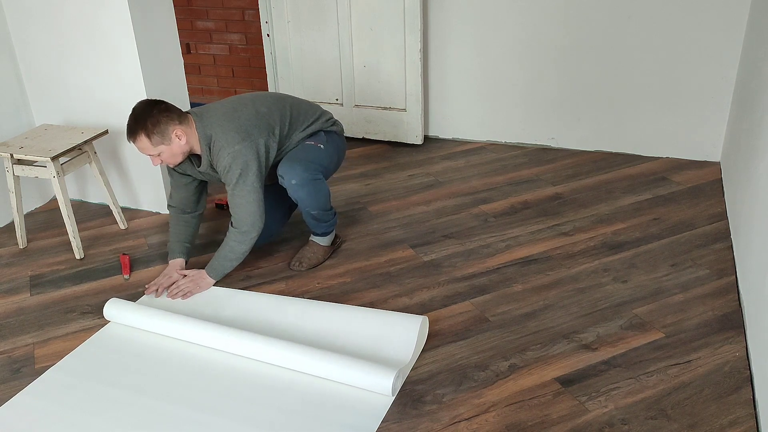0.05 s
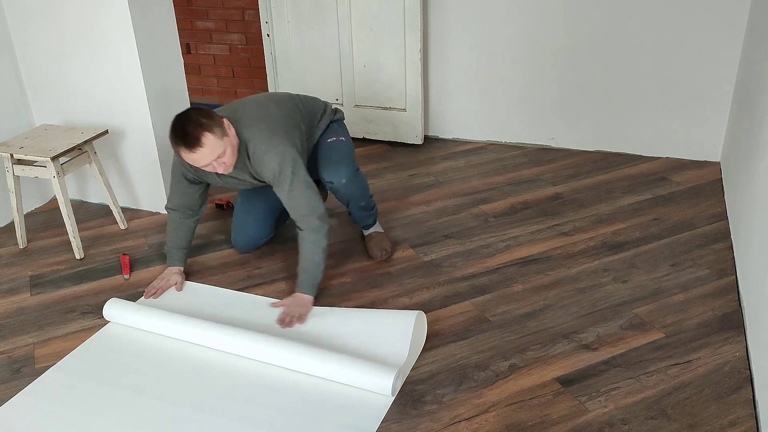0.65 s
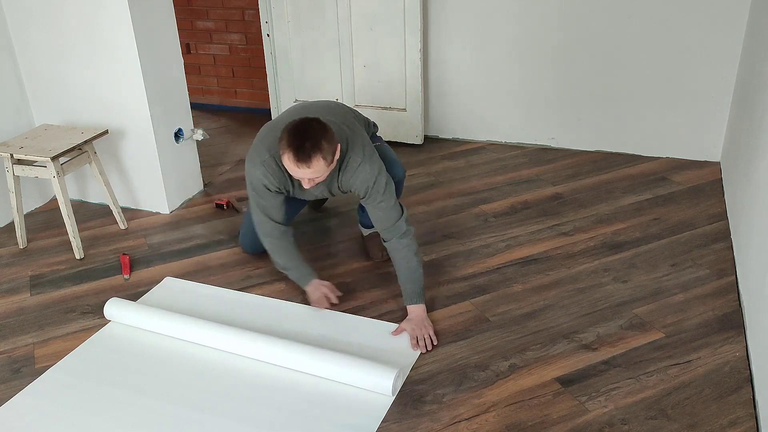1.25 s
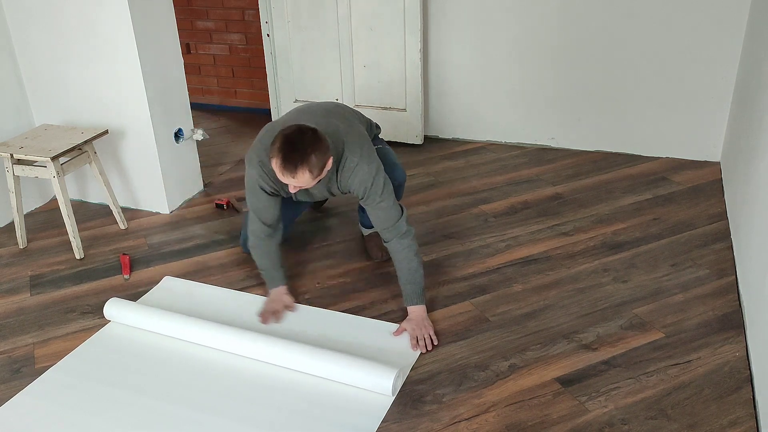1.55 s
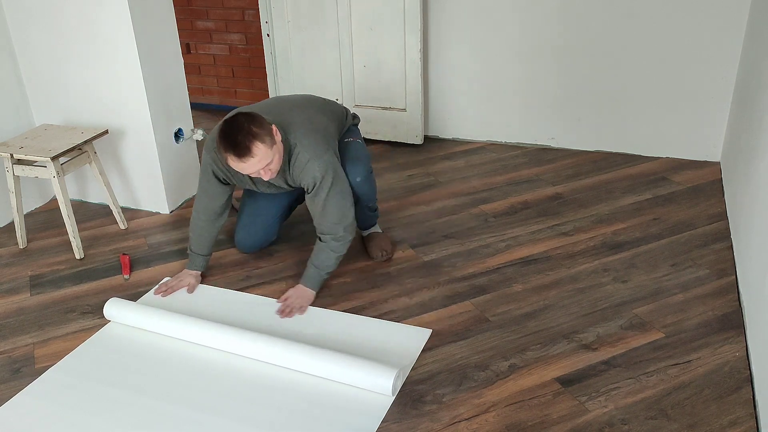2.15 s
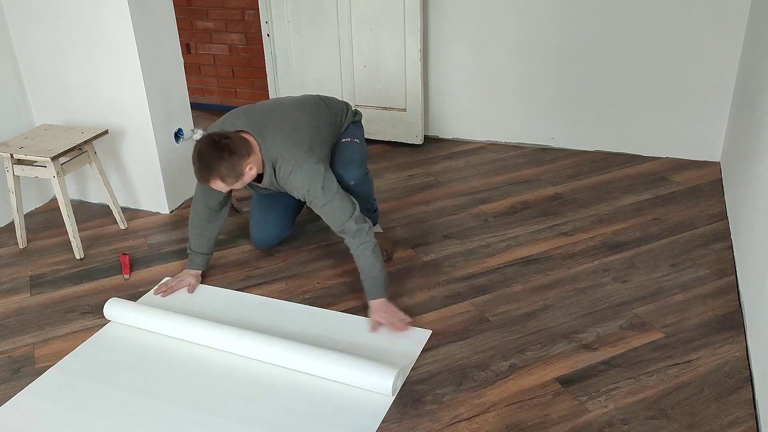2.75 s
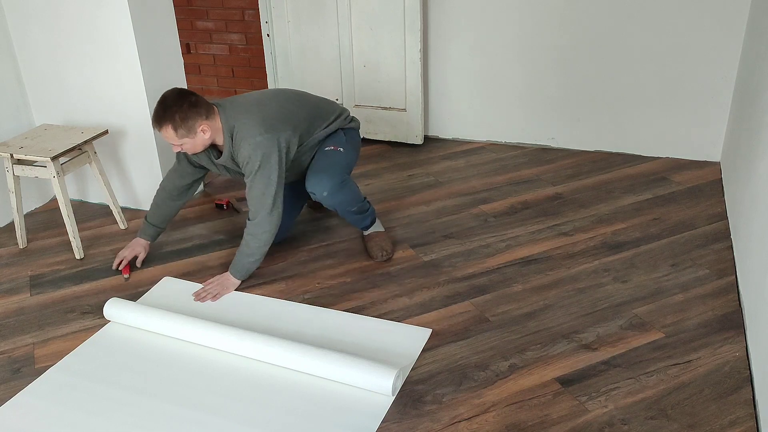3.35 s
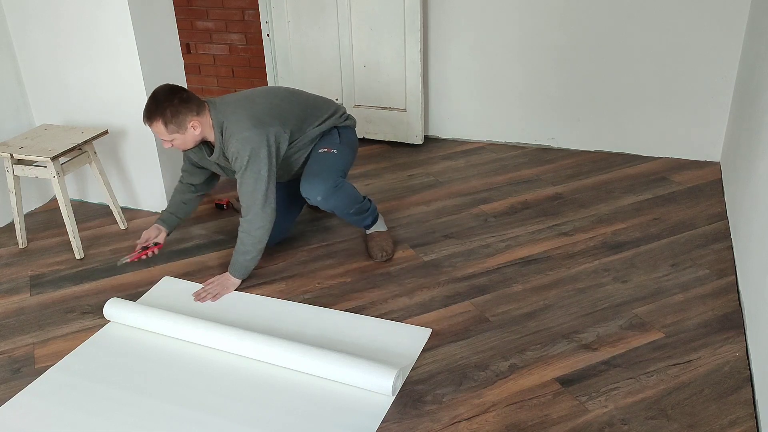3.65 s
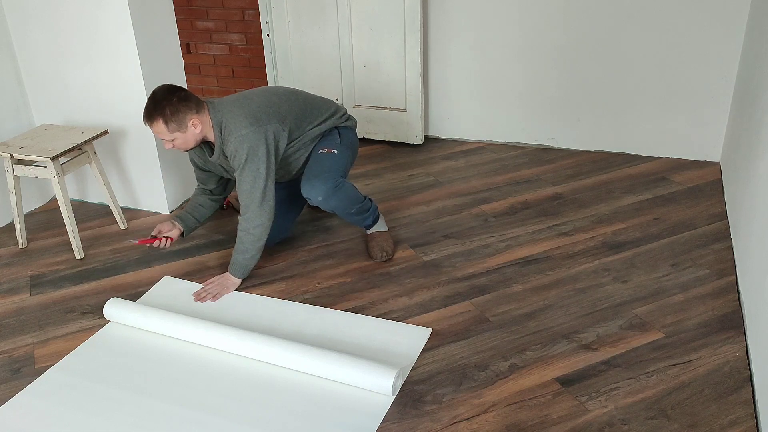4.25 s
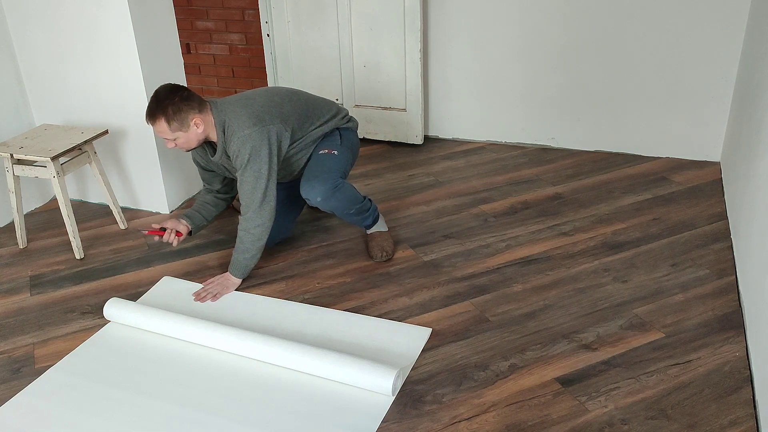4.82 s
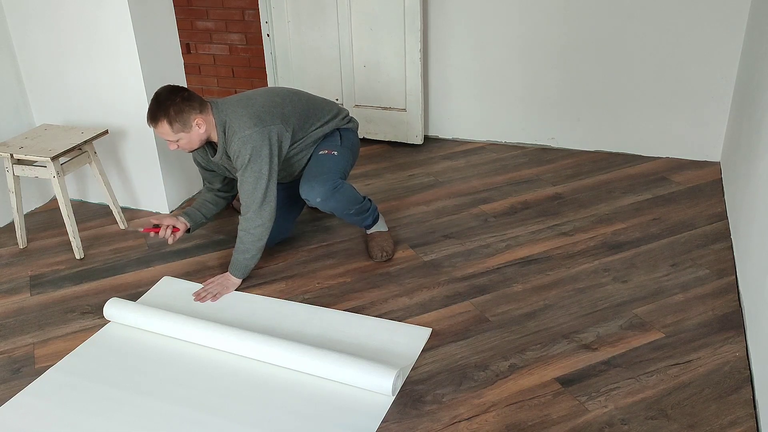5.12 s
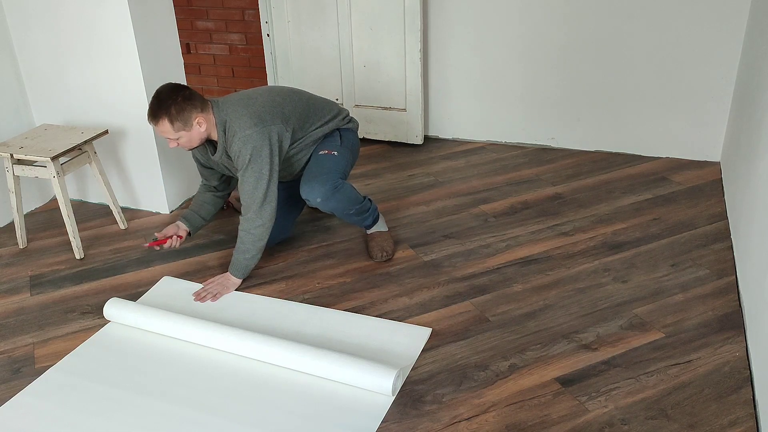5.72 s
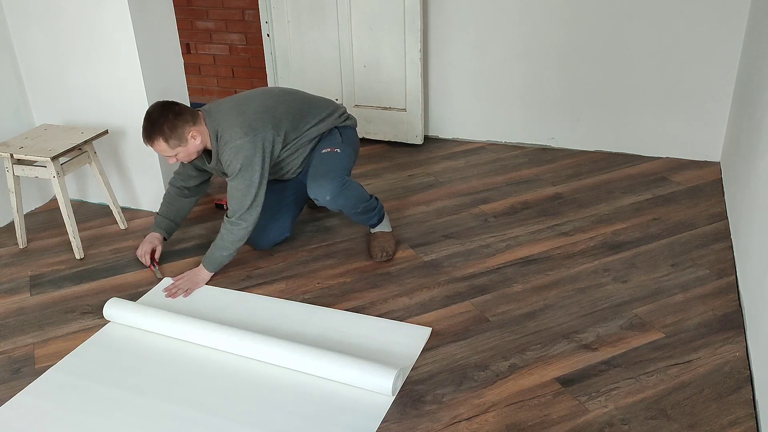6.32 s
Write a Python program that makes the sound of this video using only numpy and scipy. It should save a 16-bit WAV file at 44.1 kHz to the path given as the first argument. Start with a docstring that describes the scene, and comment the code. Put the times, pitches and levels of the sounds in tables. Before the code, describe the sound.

After faint sleeve rubs, a palm sweeps across wallpaper on a laminate floor from about 0.4 to 1.1 seconds. The curled end rustles and buckles in a few quick crinkles, and a knee thumps softly on the boards. A second, louder hissing sweep with a raspy edge swells from 1.5 to 1.9 seconds, a third runs from 2.1 to 2.7, and a small brush follows at 3.1. Around 3.5 seconds a plastic craft knife is picked up with a short scrape, and it gives a sharp click near 4. Its blade is pushed out in brief, bright scrapes and clicks, lightly around 4.8 and more strongly between 5.1 and 5.6. A softer swish of paper comes at 6 seconds, then a faint tick at 6.5. Everything is heard from a few metres away, with the echo of bare walls, over faint room hiss and low rumble.

```python
"""Wallpaper and craft knife in a bare room

Two microphones stand a few metres off and hear mostly the echo of the walls. On the laminate floor a palm
smooths wallpaper in long, hissing sweeps; the curled end rustles and buckles as it is pressed down.
Then a plastic craft knife is picked up and its blade pushed out in short scrapes and clicks that ring
handle and steel. Underneath are soft sleeves and knees, and the room's faint hiss and rumble."""
import sys
import numpy as np
from scipy import signal
from scipy.fft import rfft, irfft, next_fast_len
from scipy.io import wavfile
from scipy.ndimage import map_coordinates

SR = 44100
rng = np.random.default_rng(int(sys.argv[2]) if len(sys.argv) > 2 else 0)


def master_out(mix):
    """Clip the mix to full scale and print it as 16-bit PCM to the path in sys.argv[1]."""
    frames = np.transpose(np.atleast_2d(mix))
    ceiling = np.clip(frames, -1, 1)
    pcm = np.round(ceiling * 32767).astype(np.int16)
    wavfile.write(sys.argv[1], SR, pcm)


N = 290178


def amp(db):
    """Decibels to gain."""
    return 10 ** (np.asarray(db) / 20)


def unit(x):
    """Scale to rms 1."""
    return x / np.sqrt(np.mean(x ** 2) + 1e-20)


def along(points, hz):
    """(Hz, value) points read on a log axis."""
    freqs, values = np.transpose(points)
    return np.interp(np.log(hz + 1), np.log(freqs + 1), values)


def add(track, start, sound):
    """Mix a sound in at start seconds."""
    part = track[max(round(start * SR), 0):][:len(sound)]
    part += sound[:len(part)]


def swell(rows):
    """Gain per sample: each row rises along a bowed curve, holds and falls almost straight."""
    t, gain = np.arange(N) / SR, np.zeros(N)
    for start, rise, hold, fall, db in rows:
        up = np.clip((t - start) / rise, 0, 1) ** 0.66
        down = np.clip(1 - (t - start - rise - hold) / fall, 0, 1) ** 0.97
        gain += amp(db) * up * down
    return gain


def filtered(x, response):
    """Pass x through a complex response of frequency."""
    n = x.shape[-1]
    size = next_fast_len(n + SR // 4)
    return irfft(rfft(x, size) * response(np.fft.rfftfreq(size, 1 / SR)), size)[..., :n]


def coloured(x, spectrum):
    """Shape x by (Hz, dB) points."""
    return filtered(x, lambda hz: amp(along(spectrum, hz)))


def ring(modes, hz):
    """Response of (centre Hz, width Hz, dB) resonances of alternating sign."""
    return sum((-1) ** k * amp(db) * 1j * hz * width / (centre ** 2 - hz ** 2 + 1j * hz * width)
               for k, (centre, width, db) in enumerate(modes))


def slips(n, rate, spread_db):
    """Tiny stick-slip impulses of uneven size at random times, about rate a second, rms 1."""
    chance, sizes, signs = rng.random(n), rng.standard_normal(n), rng.choice([-1, 1], n)
    return unit((chance < rate / SR) * signs * amp(spread_db * sizes))


# Diffuse sound at the microphone pair. Each row: frequency in Hz, left-right likeness from 0 to 1.
MIC_LIKENESS = [(100, 0.59), (300, 0.77), (600, 0.42), (1100, 0), (14000, 0)]

def diffuse(pair):
    """Two unrelated signals as closely spaced microphones hear them: alike in the bass only."""
    turn = lambda hz: np.arccos(np.clip(along(MIC_LIKENESS, hz), -1, 1)) / 2
    mid, side = filtered(pair, lambda hz: np.array([np.cos(turn(hz)), np.sin(turn(hz))]))
    return np.array([mid + side, mid - side])


# The air and the rumble all round the microphones. Each row: frequency in Hz, relative level in dB.
AIR_SPECTRUM = [(20, 2.5), (45, -10.5), (58, 2.5), (78, -10), (120, -9), (230, -11), (330, -17), (650, -24),
                (1100, -20.5), (3000, -19.5), (5000, -27), (7500, -26.5), (10000, -35), (14000, -33.5)]
RUMBLE_SPECTRUM = [(4, 4), (12, 3.5), (25, -4), (50, -10), (110, -31), (400, -82)]
# Extra rumble. Each row: start, rise, hold and fall in seconds, level in dB.
RUMBLE_SURGE = [(4.45, 0.5, .1, 1.7, -60)]

def room_tone(air_db, rumble_db):
    """The still room: faint hiss over a low rumble, steady but for one slow swell."""
    air = diffuse(coloured(rng.standard_normal((2, N)), AIR_SPECTRUM))
    rumble = diffuse(coloured(rng.standard_normal((2, N)), RUMBLE_SPECTRUM))
    return amp(air_db) * unit(air) + (amp(rumble_db) + swell(RUMBLE_SURGE)) * unit(rumble)


# The bare room's echo. Each row: frequency in Hz, seconds to die away by 60 dB.
DECAY_TIMES = [(150, 1), (800, 1), (2200, 0.99), (4000, 0.77), (7000, 0.62), (13000, 0.36)]

def room_decay(hz, t):
    """Gain left in each band after t seconds; the treble dies first."""
    return amp(-60 * t / along(DECAY_TIMES, hz)[:, None])


def wall_echo(direct_db, early_db, early_s):
    """Impulse response from one spot to the microphones: direct sound, early reflections, tail."""
    hz, t, noise = signal.stft(rng.standard_normal((2, SR)), SR, nperseg=256)
    decay = room_decay(hz, t) * (1 + amp(early_db) * np.exp(-t / early_s))
    decay /= np.sqrt(np.mean(decay ** 2, axis=1, keepdims=True))
    response = diffuse(signal.istft(noise * decay, SR, nperseg=256)[1])
    response /= np.linalg.norm(response, axis=1, keepdims=True)
    response[:, 0] += amp(direct_db)
    return response


def scattered(x):
    """Fully diffuse reverberation: fresh noise in each band holds the source's dying energy."""
    hz, t, bands = signal.stft(np.pad(x, (256, 0)), SR, nperseg=512)
    fade = room_decay(hz, t[t < 1]) ** 2
    fade /= fade.sum(axis=1, keepdims=True)
    energy = signal.fftconvolve(np.abs(bands) ** 2, fade, axes=1)[:, :len(t)]
    noise = signal.stft(rng.standard_normal((2, N + 256)), SR, nperseg=512)[2]
    tail = signal.istft(noise * np.sqrt(np.abs(energy)), SR, nperseg=512)[1][:, :N]
    return unit(diffuse(tail)) * np.std(x)


def room(x, still_share, direct_db, early_db, early_s):
    """A source a few metres off: part of its echo comes from still walls, the rest keeps changing."""
    walls = signal.fftconvolve(x[None], wall_echo(direct_db, early_db, early_s), axes=1)[:, :N]
    return np.sqrt(still_share) * walls + np.sqrt(1 - still_share) * scattered(x)


def scuff(length, spectrum):
    """A brief, coarse rub that starts quickly and lets go after length seconds."""
    t = np.arange(SR // 3) / SR
    push = (1 - np.exp(-t / 0.00067)) * np.exp(-np.maximum(t - length, 0) / 0.011)
    grain = coloured(slips(len(t), rate=1800, spread_db=4.0), spectrum)
    return push * unit(grain)


# Sleeves, and the knife's handle on the floor. Each row: start and length in seconds, level in dB.
FLOOR_RUBS = [(.01, 0.23, -65.5), (.198, 0.25, -66), (1.461, 0.084, -57), (1.757, 0.21, -56.5),
              (2.097, 0.097, -61.5), (3.101, 0.15, -58.5), (3.46, 0.071, -54.5), (5.149, .12, -67.5),
              (5.59, 0.068, -57.5), (6.16, 0.068, -56.5), (6.481, 0.04, -65)]
# Their dull colour. Each row: frequency in Hz, relative level in dB.
RUB_SPECTRUM = [(100, -17), (260, -7), (450, 1.5), (780, -0.5), (1100, -0.5), (1600, -4.5), (4000, -15)]
# Knees and hands settling on the boards. Each row: start in seconds, level in dB, pitch in Hz.
FLOOR_THUMPS = [(0.199, -56.5, 184), (0.831, -49, 125), (0.859, -48, 59), (1.82, -52, 260),
                (1.89, -58.5, 113), (2.145, -54.5, 137), (2.429, -62, 140), (2.898, -59, 180),
                (4.27, -60, 105)]

def kneeling():
    """Someone shifts about on the floor: soft rubs, and low thumps from the boards."""
    track = np.zeros(N)
    t = np.arange(SR // 3) / SR
    for start, length, db in FLOOR_RUBS:
        add(track, start, amp(db) * scuff(length, RUB_SPECTRUM))
    thump = (1 - np.exp(-t / 0.0027)) * np.exp(-t / 0.031)
    for start, db, pitch in FLOOR_THUMPS:
        boards = filtered(rng.standard_normal(len(t)), lambda hz: ring([(pitch, 0.75 * pitch, 0)], hz) ** 2)
        add(track, start, amp(db) * thump * unit(boards))
    return track


# The knife's cavity, plastic shell and steel blade. Each row: centre and width in Hz, relative gain in dB.
CAVITY_MODES = [(1090, 89, -2), (1630, 114, -12)]
SHELL_MODES = [(2183, 420, -4), (2600, 390, -0.5), (3050, 340, -1.5), (4050, 610, -6)]
BLADE_MODES = [(6570, 1580, -6.5), (7700, 1620, -5.5), (12600, 4300, -17)]
# The unresonant part of a contact. Each row: frequency in Hz, relative level in dB.
CRACKLE_SPECTRUM = [(900, -9.5), (1600, 0.5), (3500, 2.5), (8000, 2.5), (10000, -15), (14000, -24)]

def knife_body(force, blade_db, contact_hz):
    """A contact rings cavity, shell, blade and the touched spot; the force's energy is kept."""
    force = np.pad(force, (0, SR // 20))
    cavity_db = -3 - 0.52 * blade_db  # the more the blade is stirred, the less the cavity
    body = filtered(force, lambda hz: amp(cavity_db) * ring(CAVITY_MODES, hz) + ring(SHELL_MODES, hz)
                    + amp(blade_db) * ring(BLADE_MODES, hz))
    # spot and crackle share the force's outline but not its fine detail
    scrambled = lambda: force * rng.choice([-1, 1], len(force))
    spot = filtered(scrambled(), lambda hz: ring([(contact_hz, 0.19 * contact_hz, -2)], hz))
    crackle = amp(-16) * coloured(scrambled(), CRACKLE_SPECTRUM)
    # so small a body radiates little bass
    bass_cut = signal.butter(N=4, Wn=900, btype="high", fs=SR, output="sos")
    sound = signal.sosfilt(bass_cut, body + spot + crackle)
    return sound * np.linalg.norm(force) / (np.linalg.norm(sound) + 1e-12)


# The knife scraping, above the floor.
# Each row: start and length in seconds, level in dB, blade ring in dB, contact ring in Hz.
KNIFE_SCRAPES = [(3.453, 0.034, -39, -18.5, 2140), (3.504, 0.054, -48, -10.5, 2000),
                 (3.959, 0.019, -32, -3, 1660), (4.462, 0.029, -57.5, -26, 1320),
                 (4.733, 0.046, -59.5, 2, 6460), (4.782, 0.076, -44, 7, 3900),
                 (5.082, 0.02, -46, -14, 2320), (5.126, 0.035, -36.5, 1.5, 4600),
                 (5.175, 0.068, -38.5, -4, 3360), (5.34, 0.019, -42, -0.5, 3140),
                 (5.483, 0.019, -47.5, -11, 2300), (5.546, .026, -36.5, 7.5, 4470),
                 (5.585, 0.054, -31.5, 1.5, 3600), (5.821, 0.033, -49, -7, 2400),
                 (5.94, 0.096, -56.5, -3, 2500), (6.016, 0.034, -49, -12, 2510)]
# The slider catching and the knife knocking.
# Each row: start in seconds, relative level in dB, blade ring in dB, contact ring in Hz.
KNIFE_CLICKS = [(4.734, -53.5, 2, 6130), (4.77, -43.5, 9, 12000), (5.135, -35, 11, 8500),
                (5.142, -37.5, 17, 8750), (5.547, -31.5, 7, 4600), (6.482, -49.5, -11, 2520)]

def knife():
    """Scrapes are short runs of slips; a click is one sharp catch."""
    track = np.zeros(N)
    t = np.arange(SR // 5) / SR
    for start, length, db, blade_db, contact_hz in KNIFE_SCRAPES:
        rise_s = 0.0052 * 2 ** (-blade_db / 18.5)  # a harder contact bites sooner
        push = (1 - np.exp(-t / rise_s)) * np.exp(-np.maximum(t - length, 0) / 0.0038)
        force = push * slips(len(t), rate=2500, spread_db=2.5)
        add(track, start, amp(db) * knife_body(force, blade_db, contact_hz))
    for start, db, blade_db, contact_hz in KNIFE_CLICKS:
        catch = np.exp(-t / 0.0012) * rng.standard_normal(len(t))
        add(track, start, amp(db + 13) * knife_body(catch, blade_db, contact_hz))
    return track


def paper_friction(spectrum, rate, spread_db, flutter_db, flutter_hz):
    """Slips coloured by the sheet; unsteady pressure makes the level wander by about flutter_db."""
    grain = coloured(slips(N, rate, spread_db), spectrum)
    knots = rng.standard_normal(int(N * flutter_hz / SR) + 4)
    pressure = map_coordinates(knots, [np.arange(N) * flutter_hz / SR])
    return unit(grain * amp(flutter_db * pressure))


# The paper's curled end. Each row: frequency in Hz, relative level in dB.
CURL_SPECTRUM = [(50, -21), (130, -14), (250, -8), (500, -1.5), (1100, -1), (1800, -1), (3000, -4.5),
                 (5000, -23), (12000, -38)]
# The curl buckling. Each row: start and length in seconds, level in dB.
CURL_BUCKLES = [(0.594, 0.0097, -35), (0.655, 0.014, -36.5), (0.741, 0.026, -36.5), (.78, 0.017, -36.5)]

def buckles():
    """The curl gives way in jerks as the hand runs over it."""
    track = np.zeros(N)
    for start, length, db in CURL_BUCKLES:
        add(track, start, amp(db) * scuff(length, CURL_SPECTRUM))
    return track


# Down on the floor the palm speeds up, glides and slows; the curl drags, then is pressed flat; fingers
# brush the sheet's edge. Each row: start, rise, hold and fall in seconds, level in dB.
PALM_SWEEPS = [(.04, 0.015, .015, 0.052, -60), (.19, 0.014, .005, 0.038, -54.5),
               (.402, 0.19, 0.43, 0.12, -37.5), (1.472, 0.31, 0.027, 0.079, -32.5),
               (2.097, .02, .015, 0.055, -42), (2.17, .21, 0.048, 0.28, -36),
               (2.78, 0.019, 0.026, 0.033, -60.5), (3.07, 0.031, 0.054, 0.13, -45.5),
               (6.012, 0.0045, 0.018, 0.11, -46.5), (6.08, 0.065, .06, 0.064, -49),
               (6.473, 0.0051, .004, 0.024, -62.5)]
CURL_PRESSES = [(.42, .015, 0.17, .04, -48), (.57, 0.034, 0.052, 0.54, -37)]
EDGE_BRUSHES = [(1.52, 0.052, .19, 0.07, -37.5)]
# Palm on the sheet, fingers on its edge. Each row: frequency in Hz, relative level in dB.
PALM_SPECTRUM = [(100, -28), (250, -25), (450, -13.5), (780, -9), (1300, -9.5), (2300, -4), (3400, -2),
                 (5400, -5), (7400, -1.5), (8300, -5.5), (9600, -11), (14000, -11)]
EDGE_SPECTRUM = [(300, -22.5), (750, -25), (1400, -18), (1850, 0), (2700, -4.5), (3700, -2), (5000, -13),
                 (7200, -8), (9500, -19), (14000, -27)]

def wallpaper():
    """The palm hisses on the flat sheet; the lifted curl adds a coarse, deep rustle, the edge a rasp."""
    hiss = paper_friction(PALM_SPECTRUM, rate=12000, spread_db=5.0, flutter_db=1.5, flutter_hz=50)
    rustle = paper_friction(CURL_SPECTRUM, rate=1800, spread_db=5.5, flutter_db=1.5, flutter_hz=59)
    rasp = paper_friction(EDGE_SPECTRUM, rate=3300, spread_db=0.5, flutter_db=0.0, flutter_hz=54)
    return swell(PALM_SWEEPS) * hiss + swell(CURL_PRESSES) * rustle + swell(EDGE_BRUSHES) * rasp


def scene():
    """Paper on the floor and the knife above it, both reaching the microphones mostly off the walls."""
    on_floor = wallpaper() + buckles() + kneeling()
    paper = room(on_floor, still_share=0.54, direct_db=-17, early_db=2.5, early_s=0.0046)
    tool = room(knife(), still_share=0.72, direct_db=-16, early_db=3, early_s=0.0031)
    return paper + tool + room_tone(air_db=-64, rumble_db=-63)


# The two microphones differ in colour. Each row: frequency in Hz, left minus right in dB.
MIC_BALANCE = [(200, 0.5), (1800, 0), (2700, -.5), (4200, -1.4), (6400, -3), (8000, 0), (9800, -1.5),
               (14000, -1.3)]

def record(dry):
    """A slightly unmatched microphone pair, with nothing kept above 14.4 kHz."""
    sides = np.array([[.5], [-.5]])
    return filtered(dry, lambda hz: amp(sides * along(MIC_BALANCE, hz)) * (hz < 14400))


dry = scene()
out = record(dry)
master_out(out)
```